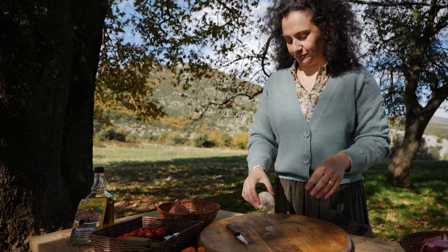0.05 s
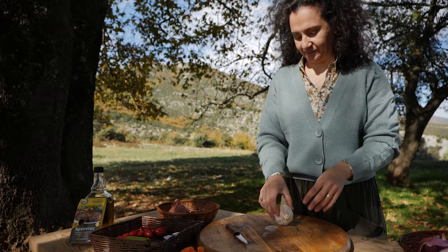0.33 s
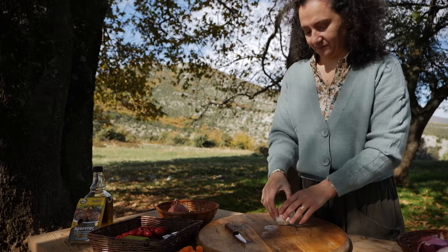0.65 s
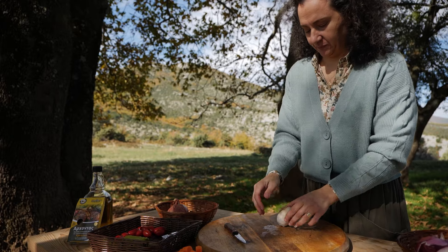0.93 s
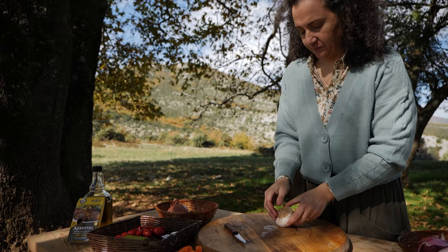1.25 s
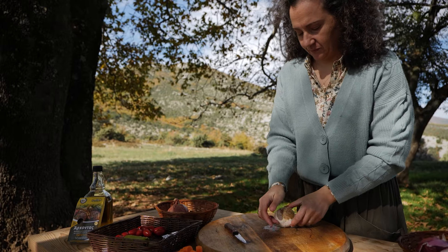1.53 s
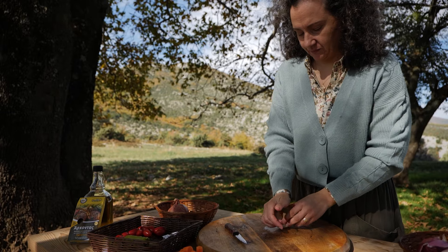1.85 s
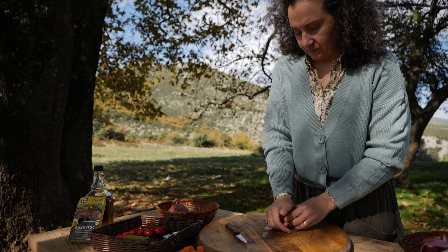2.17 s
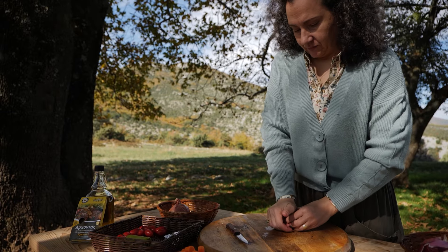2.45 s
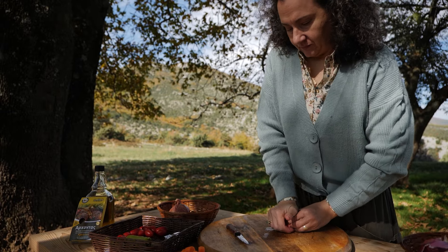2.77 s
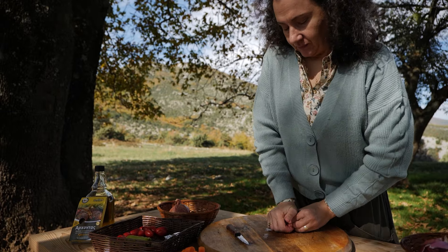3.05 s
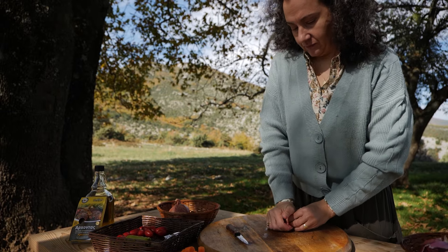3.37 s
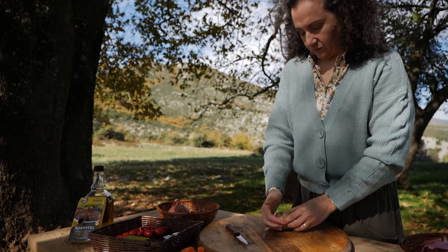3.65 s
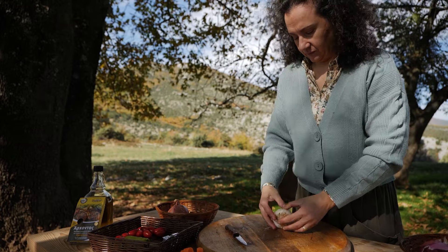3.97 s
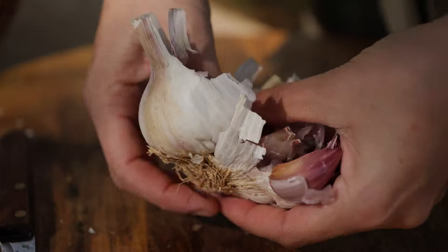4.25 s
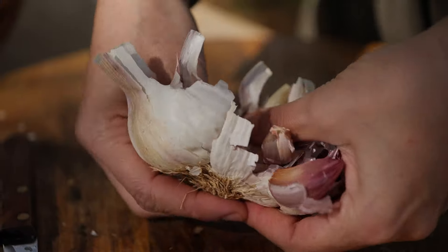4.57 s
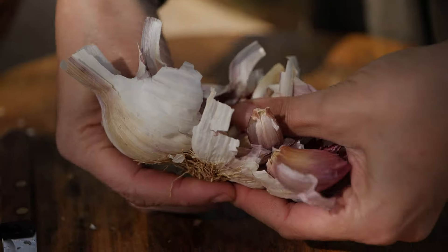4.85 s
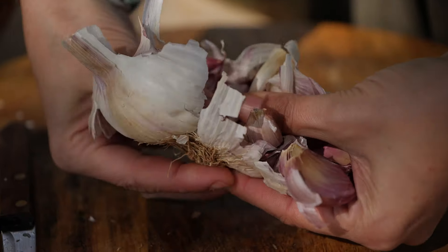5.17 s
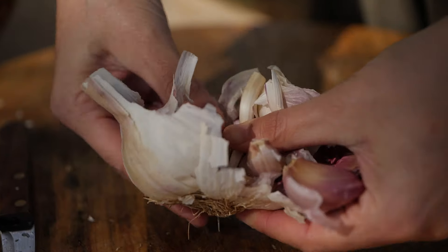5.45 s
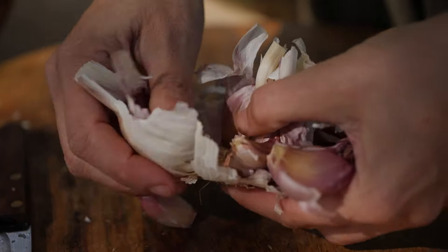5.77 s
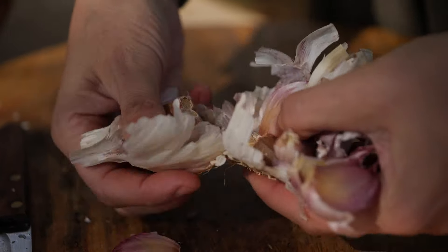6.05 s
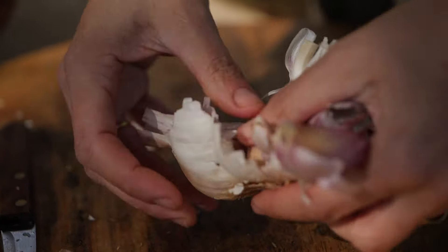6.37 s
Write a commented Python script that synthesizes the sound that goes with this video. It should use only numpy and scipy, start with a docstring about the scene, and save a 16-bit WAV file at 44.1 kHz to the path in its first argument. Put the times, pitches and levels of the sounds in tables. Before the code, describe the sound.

Hands break open a head of garlic on a wooden board outdoors, heard from close by. Light rustles and thin ticks come first, then the snaps grow louder and the cloves crack apart with a few short woody knocks. After a brief lull, the dry skins crinkle and snap densely as they are pulled apart, with several soft knocks near the end. A low rumble of air and faint hiss lie underneath.

```python
"""Papery rustling, sharp snaps and wooden knocks: hands break up a head of garlic outdoors, close by.
The dry skins crinkle as tiny cracks run through them, rasp as they slide and ring briefly as they snap.
Cloves crack apart against a wooden board and later knock on it, making the wood ring.
A soft low rumble of air and movement and a faint hiss lie underneath."""
import sys
import numpy as np
from scipy import signal
from scipy.fft import rfft, irfft, next_fast_len
from scipy.io import wavfile
from scipy.ndimage import map_coordinates

SR = 44100
rng = np.random.default_rng(int(sys.argv[2]) if len(sys.argv) > 2 else 0)


def wav_out(sig):
    """Save sig, one row per channel (or a flat mono array), as 16-bit PCM at SR to the path in sys.argv[1]."""
    wavfile.write(sys.argv[1], SR, np.round(np.clip(np.atleast_2d(sig).T, -1, 1) * 32767).astype(np.int16))


N = 282681

# how hard the fingers work the skins, light at first, firm once the head is open: (time [s], level [dB])
FINGER_GRIP = [(0, -72), (0.5, -79.5), (0.95, -65.5), (1.8, -66.5), (2.4, -60.5), (3.05, -56), (3.36, -63),
               (3.95, -63), (4.2, -55), (4.36, -46.5), (4.78, -50), (4.95, -47), (5.4, -47), (5.6, -50.5),
               (5.83, -45.5), (6.1, -46.5), (6.3, -43), (6.4, -49)]


def rustle(gain_db=-1, coarse_db=-7, tick_db=-9, light_touch_db=-60, unsteady_db=1.8):
    """Skins crinkle under the fingers: thin ticks at a light touch, a dense fizz under a firm grip."""
    # single squeezes that crush the skins: (middle [s], length [s], peak [dB])
    squeezes = [(0.68, 0.13, -66), (0.94, 0.028, -57), (1.07, 0.073, -49.5), (2.03, 0.06, -64),
                (3.19, 0.16, -44), (3.58, 0.27, -52.5), (4.35, 0.037, -49), (4.99, 0.09, -46),
                (5.17, 0.08, -46.5), (5.32, 0.065, -49.5), (5.43, 0.15, -48), (6.24, 0.2, -42.5)]
    # how bright the rustle is: (time [s], treble relative to body [dB])
    brightness = [(0.6, -3.5), (1.9, -12), (2.7, -15), (3.5, -9.5), (4.6, -9.5), (5.0, -8.5), (6.3, -6)]
    grip_db = curves(FINGER_GRIP)[0] + unsteady_db * wobble(14)
    pressure_db = 10 * np.log10(amp(grip_db) ** 2 + swells(squeezes))
    treble_db, = curves(brightness)
    fine = np.array(crackle(per_second=4500, spread_db=2.5, clump_db=1.5))
    coarse = np.array(crackle(per_second=220, spread_db=1.0, clump_db=2.0))
    body, treble = fine + amp(coarse_db) * coarse
    fizz = amp(pressure_db + gain_db) * (body + amp(treble_db) * treble)
    sparse = sum(crackle(per_second=31, spread_db=5, clump_db=-1.0))
    ticks = unit(high_pass(sparse, 3900, order=3))
    return fizz + amp(np.minimum(pressure_db, light_touch_db) + tick_db) * ticks


def crackle(per_second, spread_db, clump_db):
    """Tiny cracks in dry skin each give a ping; returns a body band and a treble band, equally strong."""
    # the tone of dry skin: (frequency [Hz], level [dB])
    skin_tone = [(150, -32), (330, -3), (900, -9), (1600, -7.5), (2500, -6.5), (3300, -3), (4000, 0.5),
                 (4900, -10.5), (6500, -10), (10500, -9), (14000, -5.5), (16500, -10.5)]
    when, pitch, strength, sign, life = rng.random((int(per_second * N / SR), 5)).T
    t = np.arange(80) / SR
    hz = 1000 + 15000 * pitch[:, None]
    t60 = 0.00024 + 0.0015 * life[:, None]  # seconds to fade by 60 dB
    size = amp(spread_db * np.minimum(-np.log(1 - strength), 4.2)) * np.sign(sign - .5)
    pings = size[:, None] * np.cos(2 * np.pi * hz * t) * amp(-60 * t / t60)
    positions = (when * N).astype(int)[:, None] + np.arange(len(t))
    cracks = np.bincount(positions.ravel(), pings.ravel(), minlength=N)[:N]
    clumps = amp(clump_db * (wobble(170) + 0.95 * wobble(35)))  # cracks come in little avalanches
    skin = coloured(cracks * clumps, skin_tone)
    body = filtered(skin, lambda hz: 1 / (1 + (hz / 9000) ** 8))
    return unit(body), unit(skin - body)


def snaps(flake_cycles=16, tick_hz=12300, tick_t60=0.00078, grit=0.72, noisy_db=-2, tick_gain_db=-1):
    """A skin breaks: its flake rings, the edge ticks and a brief, noisy ring near 4 kHz follows."""
    # the loudest snaps: (time [s], ring level [dB], flake pitch [Hz], rough fade time [s], tick level [dB])
    big_snaps = [(0.7401, -55, 4060, 0.0057, -51.5), (0.9307, -54, 8150, 0.008, -51),
                 (0.991, -60, 4530, 0.0094, -47.5), (1.6552, -55, 3900, 0.006, -54),
                 (1.97, -45, 4500, 0.0081, -52), (1.9751, -45.5, 3900, 0.0082, -53),
                 (2.3565, -47, 4370, 0.0063, -46), (2.3753, -48, 3960, 0.0042, -46),
                 (2.4688, -42.5, 3430, 0.0066, -44), (2.4875, -44, 4070, 0.0037, -47),
                 (2.5152, -48.5, 4800, 0.006, -52), (2.5712, -48.5, 4270, 0.0072, -44.5),
                 (2.6894, -41, 3700, 0.0055, -41.5), (2.7124, -35.5, 4260, 0.0039, -63),
                 (2.7785, -44, 3020, 0.0084, -49), (2.8205, -41.5, 6350, 0.003, -33),
                 (2.9158, -43, 3800, 0.0059, -50), (2.998, -40, 3930, 0.0086, -43.5),
                 (3.0744, -27, 3580, 0.01, -50), (3.1232, -49, 7700, 0.0043, -36),
                 (3.1622, -33.5, 3970, 0.0065, -35), (3.1923, -32, 4140, 0.008, -38),
                 (3.2924, -27.5, 6180, 0.0055, -28.5), (3.3396, -38, 6450, 0.0024, -39),
                 (3.4214, -34.5, 4430, 0.0026, -32.5), (3.444, -39, 6550, 0.0026, -39),
                 (3.449, -26, 6240, 0.012, -29.5), (3.751, -45, 3860, 0.012, -47.5),
                 (4.293, -38, 3760, 0.008, -39), (4.3307, -27, 3860, 0.024, -33),
                 (4.4734, -31, 3230, 0.0013, -37.5), (4.6681, -44, 4070, 0.01, -39),
                 (4.7592, -40, 3700, 0.008, -38), (4.777, -44, 3940, 0.0091, -39.5),
                 (4.86, -35, 3670, 0.0054, -46), (4.8645, -32, 3600, 0.0058, -54),
                 (4.8799, -33, 3750, 0.0046, -39), (4.9263, -31.5, 4100, 0.0044, -35.5),
                 (5.0387, -31.5, 4070, 0.0065, -41), (5.3179, -47, 4340, 0.015, -38),
                 (5.619, -52, 3700, 0.0074, -38), (5.909, -50.5, 4100, 0.008, -40),
                 (5.9446, -36, 3100, 0.0031, -37), (6.0056, -34.5, 2460, 0.0066, -34.5),
                 (6.0827, -33.5, 3750, 0.021, -32.5), (6.142, -33.5, 3880, 0.015, -34),
                 (6.1734, -40, 3900, 0.0058, -35.5), (6.243, -35.5, 5500, 0.0098, -36.5),
                 (6.2802, -35.5, 3100, 0.0028, -46), (6.296, -36, 3770, 0.015, -30),
                 (6.311, -30.5, 4000, 0.0062, -24.5), (6.3542, -36.5, 3340, 0.0057, -57)]
    # the tone of a brief, noisy ring near 4 kHz after each snap: (frequency [Hz], level [dB])
    noisy_ring_tone = [(1000, -23.5), (2400, -12), (3200, -7.5), (3700, -1), (4150, 1), (4900, -25),
                       (6500, -12.5), (10000, -19.5), (16000, -31)]
    out, t = np.zeros(N), np.arange(SR // 30) / SR
    for start, ring_db, hz, fade_s, tick_db in [*big_snaps, *small_snaps()]:
        detune = np.exp(0.021 * rng.standard_normal(3))
        ring_noise, edge_noise = rng.standard_normal((2, len(t)))
        flake = damped(t, hz, flake_cycles / hz)
        flake += 0.21 * damped(t, 3700 * detune[0], fade_s / 2)
        flake += 0.24 * damped(t, 6300 * detune[1], 0.00026)
        noisy_ring = coloured(ring_noise * amp(-60 * t / (1.07 * fade_s)), noisy_ring_tone)
        drop_db = -14 * np.log2(max(hz, 3800) / 3800)  # the noisy ring is weaker after high snaps
        ring = burst(flake, 0.0017) + amp(noisy_db + drop_db) * burst(noisy_ring, fade_s / 2)
        ring = high_pass(ring, min(2700, .5 * hz), order=5)  # a thin flake gives off no bass
        edge = damped(t, min(tick_hz * detune[2], 15000), tick_t60)
        edge += grit * edge_noise * amp(-60 * t / (0.68 * fade_s))
        edge = high_pass(edge, 5950, order=3)
        add(out, start, amp(ring_db) * burst(ring, 0.0043))
        add(out, start, amp(tick_db + tick_gain_db) * burst(edge, 0.0062))
    return out


def small_snaps(firm_grip_db=-45.5, firm_per_second=22, spread_db=2.2, slots=640):
    """Chance snaps, as extra rows for snaps(): a firmer grip breaks more skins, and louder."""
    when, chance = rng.random((slots, 2)).T
    ring, pitch, tick = np.clip(rng.standard_normal((slots, 3)), -2, 2).T
    slot_s = N / SR / slots
    start = (np.arange(slots) + when) * slot_s
    firmness_db = np.interp(start, *np.transpose(FINGER_GRIP)) - firm_grip_db
    breaks = chance < slot_s * firm_per_second * 2 ** (firmness_db / 6)  # 6 dB less grip, half as many
    force_db = 0.85 * firmness_db
    ring_db = -45 + force_db + spread_db * ring
    tick_db = -42 + force_db + spread_db * tick
    hz = 3800 * np.exp(0.13 * pitch)
    fade_s = np.full(slots, 0.015)
    return np.column_stack([start, ring_db, hz, fade_s, tick_db])[breaks]


def knocks(crack_gain_db=-5.0, crack_t60=0.025, roughness=0.38, rise_s=0.00079):
    """Cloves crack off the root or strike the board; harder contact brings out its higher tones."""
    # blows that reach the board: (time [s], wood level [dB], hardness [dB], crack level [dB])
    blows = [(1.327, -65, 10, -63), (2.574, -53, -11, -52), (2.701, -53.5, -4, -41.5), (2.76, -57, -7, -46),
             (2.808, -51.5, -10, -45), (2.8346, -44.5, 11, -34), (2.9543, -46.5, 0, -34),
             (3.0458, -55, 7, -34.5), (3.0743, -40, 0, -28), (3.1403, -33, -18, -21), (3.154, -47, 9, -32),
             (3.1806, -48, -10, -32), (3.19, -46, 12, -44), (3.2136, -30, -9, -16),
             (3.227, -43.5, 5, -27.5), (3.7498, -65, 4, -47), (4.4727, -59, -2, -43.5),
             (5.708, -40, -16.5, -42), (5.765, -49, -14, -45), (5.841, -38.5, -3, -59),
             (5.998, -42.5, -8, -38), (6.04, -37.5, 0, -54), (6.104, -43, 1, -55)]
    # the tones the wooden board rings with: (frequency [Hz], level [dB], time to fade by 60 dB [s])
    board_tones = [(324.4, -5.5, 0.085), (384, 0.5, 0.089), (486.6, -0.5, 0.1), (608, -3.5, 0.14),
                   (684, 4, 0.058), (860, 3.5, 0.057), (1000, -3, 0.039), (1229, 4.5, 0.056),
                   (1643, -8.5, 0.097), (1857, -17, 0.064), (2140, -26, 0.2), (2930, -11, .07)]
    # the tone of a clove cracking: (frequency [Hz], level [dB])
    crack_tone = [(200, -16), (700, 4.5), (1300, -2), (1900, 2), (2600, -2.5), (3850, 4.5), (4450, -7),
                  (5800, -10.5), (7000, -9), (11000, -19.5), (16000, -10)]
    out, t = np.zeros(N), np.arange(SR // 6) / SR
    for start, wood_db, hardness_db, crack_db in blows:
        wood = np.zeros(len(t))
        for k, (hz, tone_db, t60) in enumerate(board_tones):
            highness = np.clip(np.log2(hz / 680) / 0.4, 0, 1)
            spot_db, detune = rng.normal(0, [1.2, .008])  # no two blows ring quite alike
            gain = amp(tone_db + highness * (hardness_db + 6) + spot_db)
            wood += (-1) ** k * gain * damped(t, hz * (1 + detune), t60)
        wood = high_pass(wood * (1 - np.exp(-t / rise_s)), 307, order=4)
        crack = roughness * rng.standard_normal(len(t)) * amp(-60 * t / crack_t60)
        crack[0] += 2.05  # the first break, ahead of the tearing fibres
        add(out, start, amp(wood_db) * burst(wood, 0.019))
        add(out, start, amp(crack_db + crack_gain_db) * burst(coloured(crack, crack_tone), 0.01))
    return out


def rubs(fade_s=0.01):
    """A sliding skin gives a short, dense, smooth rasp; on the board it scrapes lower."""
    # skin sliding: (start [s], length [s], level [dB], relative treble [dB], relative scrape [dB])
    slides = [(1.041, 0.033, -46.5, -7.5, -11.5), (1.274, 0.12, -57, -9, -26),
              (5.851, 0.026, -36.5, -7, -31), (6.232, 0.028, -43, 2, -32)]
    # the tone of skin scraping on wood: (frequency [Hz], level [dB])
    scrape_tone = [(250, -45), (600, -11), (1100, 7), (1600, 0), (2500, -45), (6000, -32)]
    body, treble = crackle(per_second=13000, spread_db=-2.0, clump_db=1.0)
    scrape = unit(coloured(rng.standard_normal(N), scrape_tone))
    out, t = np.zeros(N), np.arange(N) / SR
    for start, length, db, treble_db, scrape_db in slides:
        stroke = np.clip(np.minimum(t - start, start + length - t) / fade_s + .5, 0, 1)
        out += amp(db) * stroke * (body + amp(treble_db) * treble + amp(scrape_db) * scrape)
    return out


def echo(x):
    """Sound bounces off the table and trees, leaving a short, thin tail."""
    # how long the tail lasts: (frequency [Hz], time to fade by 60 dB [s])
    fade_times = [(200, 0.073), (1000, 0.3), (4000, 0.31), (6000, 0.072), (12000, 0.019)]
    hz, t, noise = signal.stft(rng.standard_normal(SR // 3), SR, nperseg=256)
    fade = amp(-60 * t / along(fade_times, hz)[:, None])
    tail = signal.istft(noise * fade, SR, nperseg=256)[1]
    return signal.fftconvolve(x, tail / np.linalg.norm(tail))[:N]


def outdoors(rumble_gain_db=-1.5, flutter_db=1.5, drift_db=2.0, hiss_db=-62.0):
    """Air and movement make a low, uneven rumble with a few soft bumps, over a steady faint hiss."""
    # the tones of the rumble and the hiss: (frequency [Hz], level [dB])
    rumble_tone = [(25, 0), (50, -12), (78, -35), (100, -12.5), (135, -5), (180, 3), (245, -0.5), (320, -9),
                   (450, -19.5), (700, -27.5), (1500, -28), (4000, -89)]
    hiss_tone = [(80, -14.5), (300, 8), (600, 4), (1300, -2), (2800, -3), (3500, 0), (4050, 5), (4700, 1.5),
                 (5600, -6), (8000, -14), (10500, -19), (16000, -31)]
    # the rise and fall of the rumble: (time [s], level [dB])
    rumble_levels = [(0, -56), (0.9, -65.5), (1.1, -58.5), (2.9, -56.5), (3.1, -54.5), (3.55, -55.5),
                     (4.15, -51), (5.22, -53.5), (5.45, -63.5), (6.4, -64)]
    # soft low bumps as the hands and arms shift: (middle [s], length [s], peak [dB])
    arm_bumps = [(0.75, 0.1, -56), (2.09, 0.14, -51), (3.25, 0.05, -49), (3.37, 0.15, -52.5),
                 (3.98, 0.11, -40.5)]
    rumble = unit(coloured(rng.standard_normal(N), rumble_tone) * amp(flutter_db * wobble(25)))
    hiss = unit(coloured(rng.standard_normal(N), hiss_tone))
    air = amp(curves(rumble_levels)[0] + drift_db * wobble(13))
    return amp(rumble_gain_db) * np.sqrt(air ** 2 + swells(arm_bumps)) * rumble + amp(hiss_db) * hiss


def amp(db):
    """Turn decibels into a gain."""
    return 10 ** (np.asarray(db) / 20)


def unit(x):
    """Scale to an average strength (rms) of 1."""
    return x / np.sqrt(np.mean(x ** 2) + 1e-20)


def burst(x, seconds):
    """Give a short sound the energy of strength 1 held for that long."""
    return x * np.sqrt(seconds * SR / (np.sum(x ** 2) + 1e-20))


def along(points, hz):
    """Read between (frequency, value) points, with octaves evenly spaced."""
    frequencies, values = np.transpose(points)
    return np.interp(np.log(hz + 1), np.log(frequencies), values)


def curves(rows):
    """One value per sample for each column after the time."""
    times, *columns = np.transpose(rows)
    return [np.interp(np.arange(N) / SR, times, column) for column in columns]


def swells(rows):
    """Summed power of smooth swells given as (middle [s], length [s], peak [dB])."""
    t = np.arange(N) / SR
    return sum(amp(db) ** 2 * np.exp(-2 * (2 * (t - middle) / length) ** 2) for middle, length, db in rows)


def wobble(per_second):
    """A smooth curve through that many random points a second."""
    points = rng.standard_normal(int(N * per_second / SR) + 4)
    return map_coordinates(points, [np.arange(N) * per_second / SR])


def damped(t, hz, t60):
    """A struck tone that fades by 60 dB in t60 seconds."""
    return np.sin(2 * np.pi * hz * t) * np.exp(-np.log(1000) * t / t60)


def add(track, seconds, sound):
    """Mix a sound in at the given time."""
    start = max(round(seconds * SR), 0)
    part = track[start:start + len(sound)]
    part += sound[:len(part)]


def filtered(x, response):
    """Scale each frequency by response(hz)."""
    size = next_fast_len(len(x) + 8192)
    return irfft(rfft(x, size) * response(np.fft.rfftfreq(size, 1 / SR)), size)[:len(x)]


def coloured(x, tone, size=4096):
    """Give a sound the tone (frequency [Hz], level [dB]) while keeping its attacks sharp."""
    gains = amp(along(tone, np.fft.rfftfreq(size, 1 / SR)))
    cepstrum = irfft(np.log(gains))
    cepstrum[1:size // 2] *= 2  # folded so that the filter rings only after a hit, never before
    cepstrum[size // 2 + 1:] = 0
    return signal.fftconvolve(x, irfft(np.exp(rfft(cepstrum))))[:len(x)]


def high_pass(x, hz, order):
    """Cut the sound below hz; a higher order cuts more steeply."""
    return signal.sosfilt(signal.butter(order, hz, "high", fs=SR, output="sos"), x)


def scene(echo_db=-23):
    """Everything reaches one microphone, alike in both channels."""
    background = outdoors()
    garlic = rustle() + rubs() + knocks() + snaps()
    mono = garlic + amp(echo_db) * echo(garlic) + background
    return np.array([mono, mono])


def record(dry, top_hz=16000):
    """The recorder cuts the deep bass and the very highest treble."""
    thin = high_pass(dry, 94, order=3)
    return np.array([filtered(channel, lambda hz: 1 / (1 + (hz / top_hz) ** 160)) for channel in thin])


dry = scene()
out = record(dry)
wav_out(out)
```